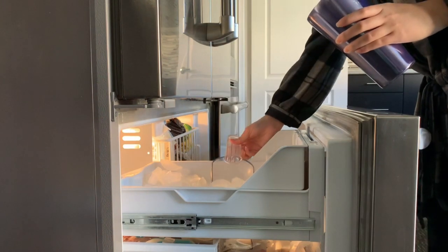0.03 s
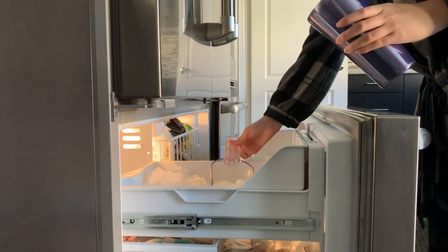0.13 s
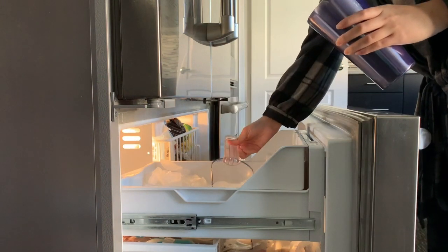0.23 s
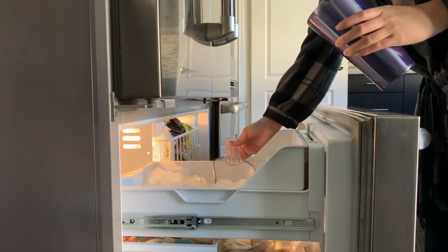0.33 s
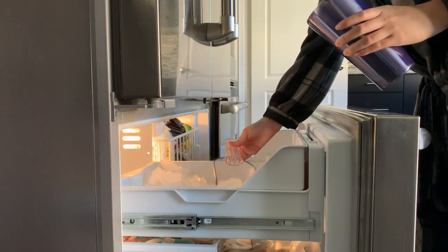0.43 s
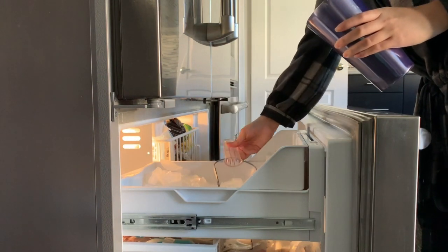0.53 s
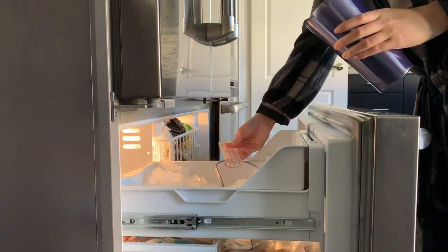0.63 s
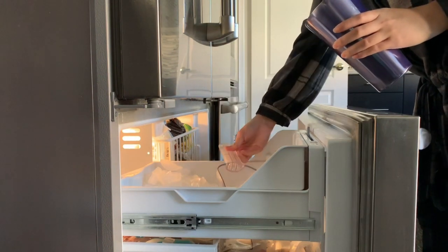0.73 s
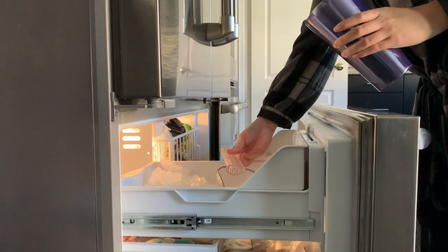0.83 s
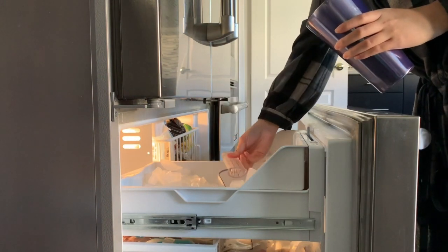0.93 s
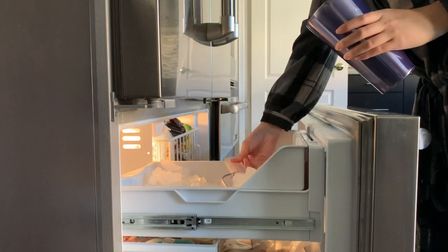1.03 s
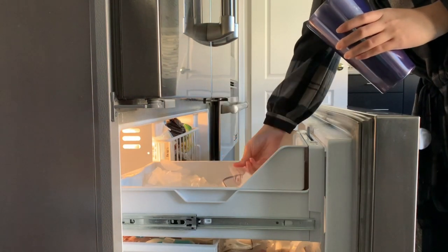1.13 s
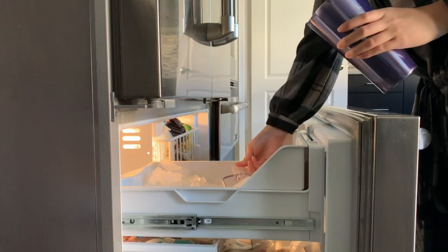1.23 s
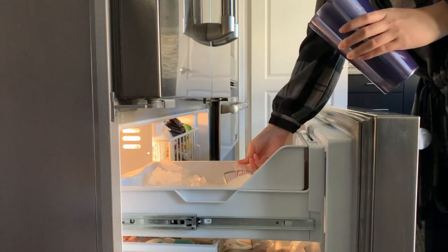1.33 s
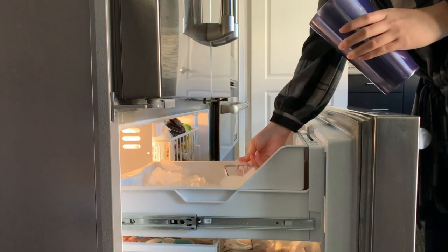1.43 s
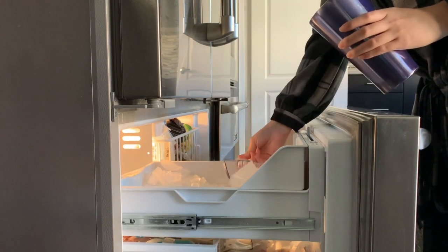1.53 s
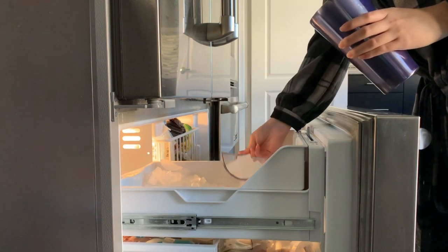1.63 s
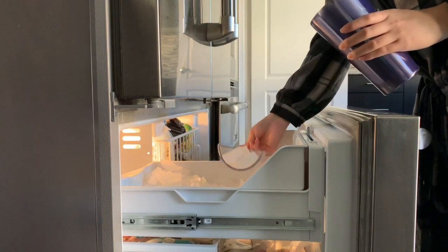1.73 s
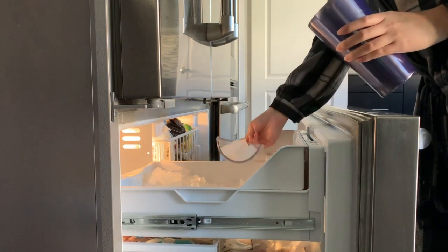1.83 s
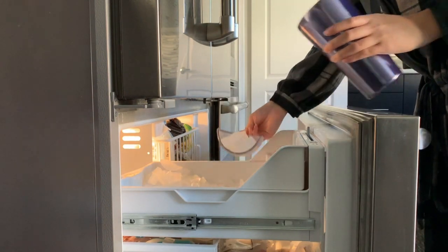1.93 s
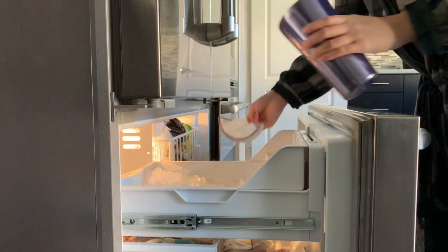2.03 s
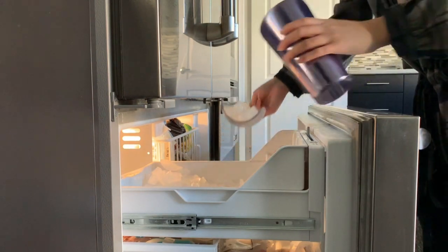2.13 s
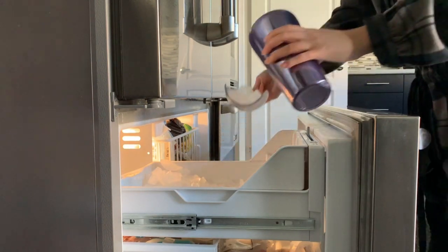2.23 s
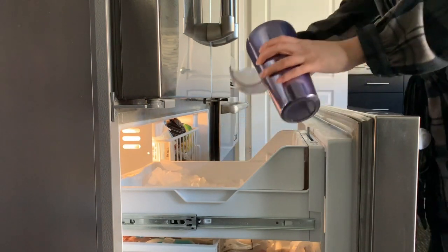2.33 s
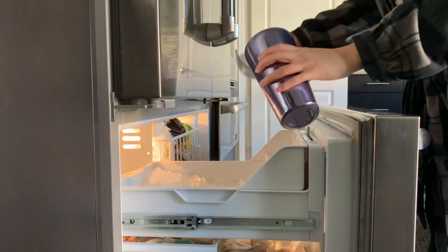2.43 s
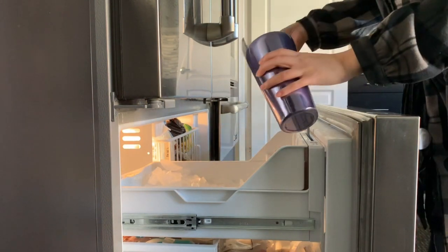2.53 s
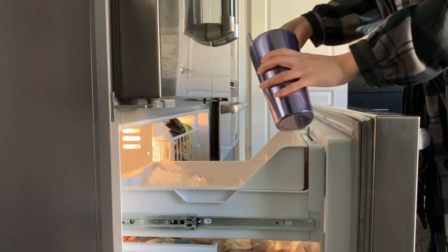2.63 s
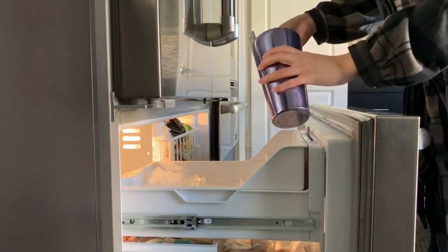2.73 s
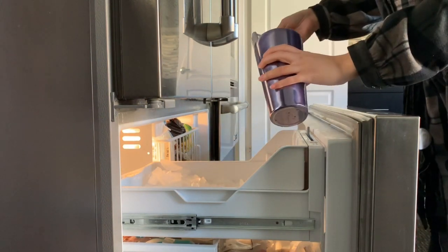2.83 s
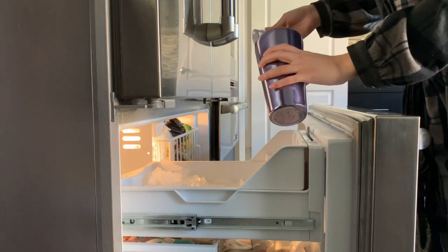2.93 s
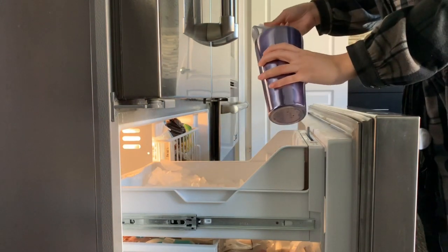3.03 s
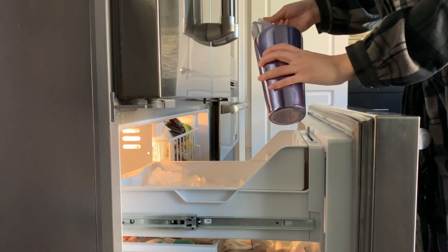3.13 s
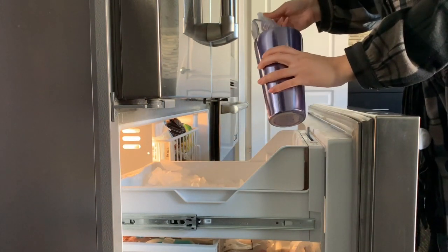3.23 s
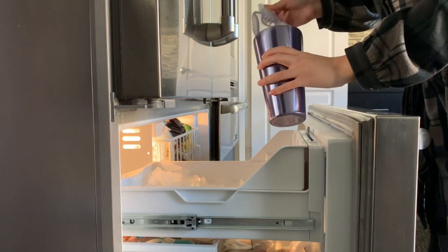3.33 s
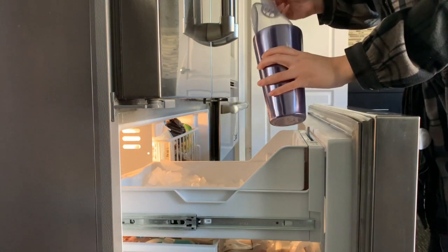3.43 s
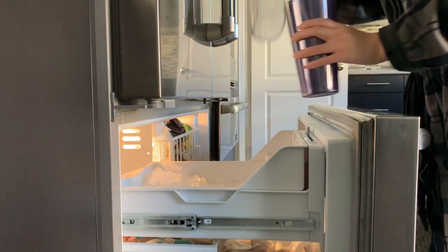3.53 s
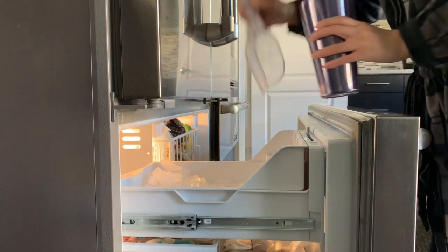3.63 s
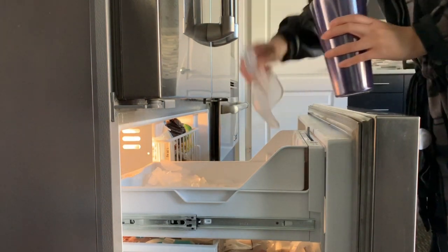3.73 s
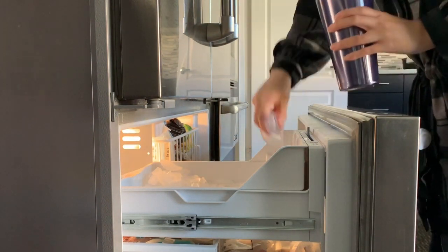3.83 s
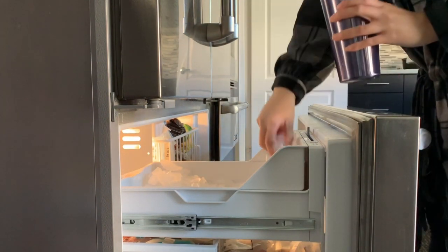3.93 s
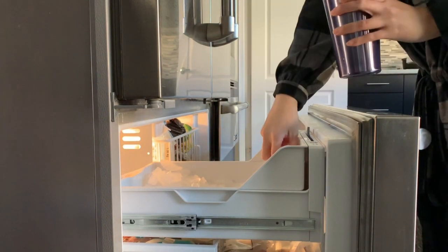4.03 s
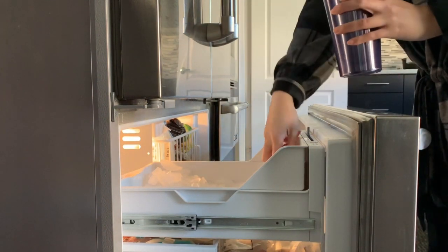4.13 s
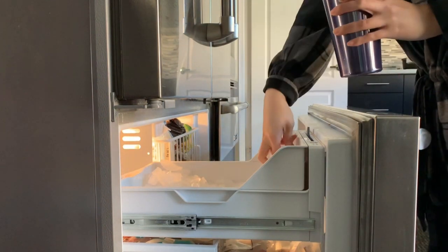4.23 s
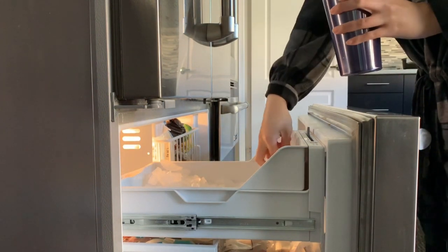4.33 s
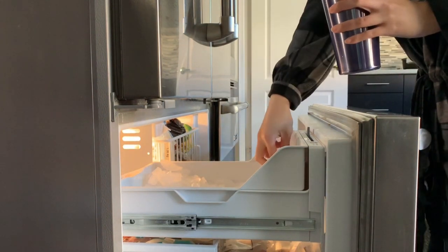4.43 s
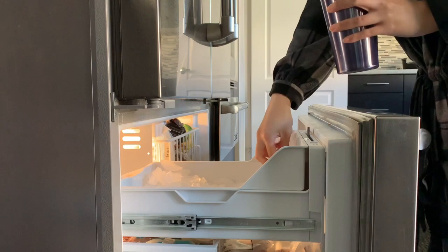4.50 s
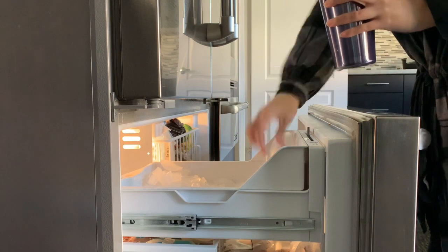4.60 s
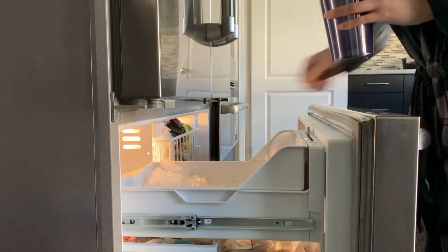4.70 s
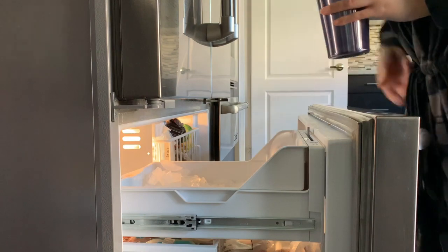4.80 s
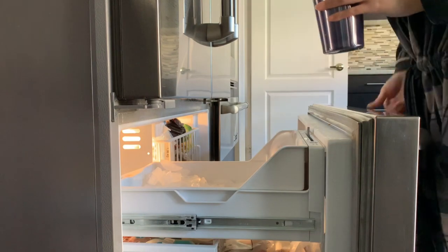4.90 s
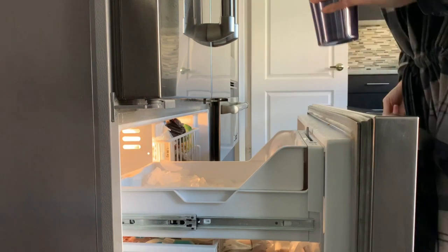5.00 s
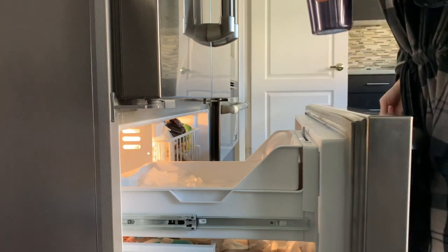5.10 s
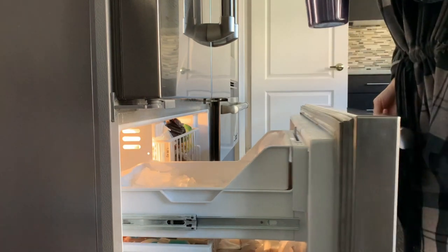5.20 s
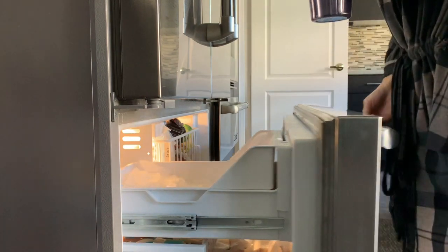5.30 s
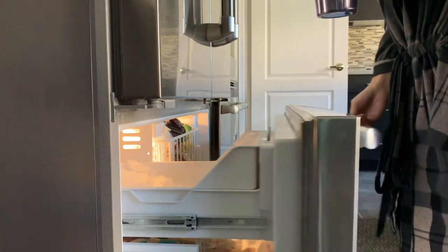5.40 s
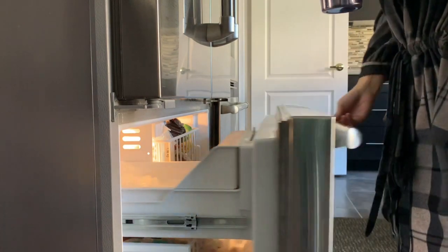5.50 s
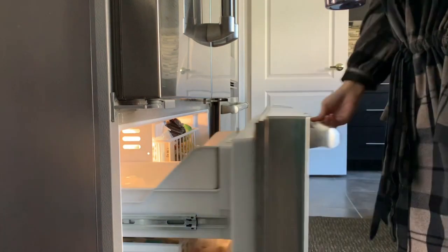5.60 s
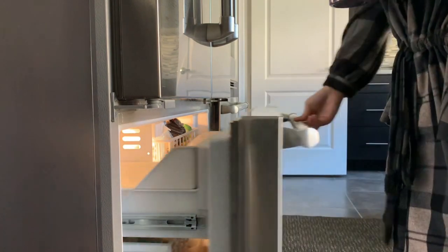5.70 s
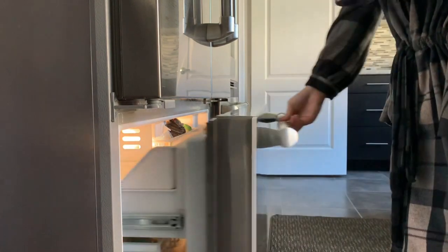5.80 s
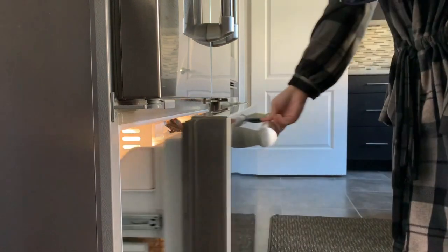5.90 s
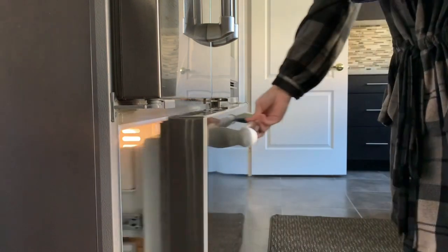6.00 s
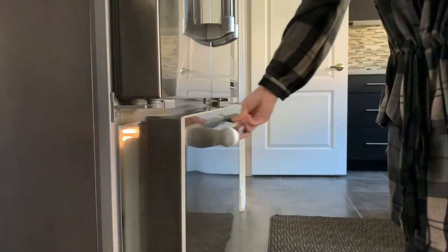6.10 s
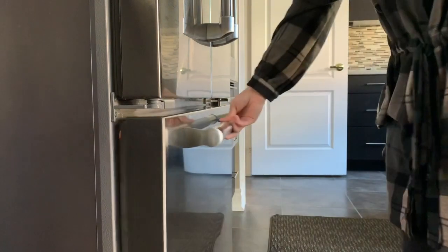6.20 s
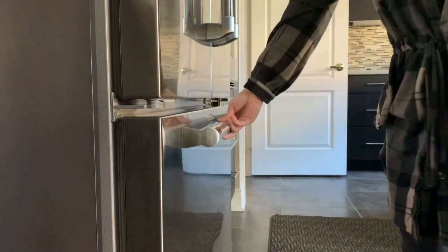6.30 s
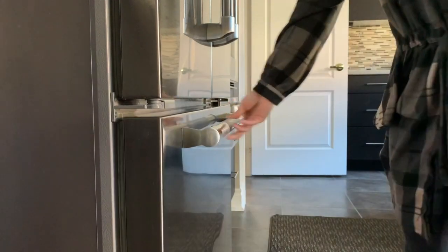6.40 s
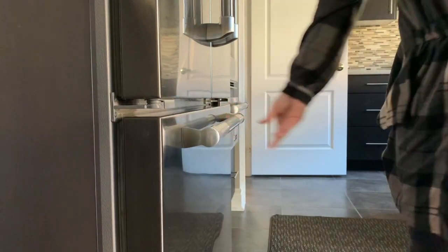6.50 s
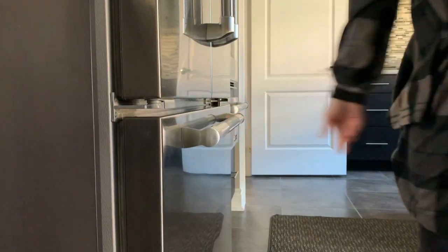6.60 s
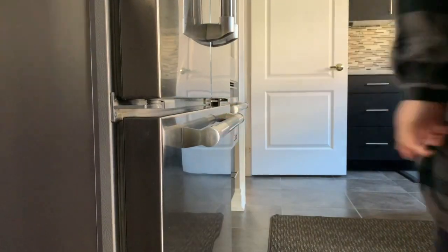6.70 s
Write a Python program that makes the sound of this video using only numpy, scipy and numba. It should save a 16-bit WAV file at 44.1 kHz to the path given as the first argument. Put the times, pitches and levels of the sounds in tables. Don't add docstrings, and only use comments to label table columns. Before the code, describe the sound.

A scoop grinds and knocks through ice cubes in a plastic bin, cubes clatter into a steel tumbler, then a freezer drawer rolls and thuds shut.

```python
import sys
import numpy as np
from scipy import signal
from scipy.fft import rfft, irfft, next_fast_len
from scipy.io import wavfile
from scipy.ndimage import uniform_filter1d
from numba import njit

SR = 44100
rng = np.random.default_rng(int(sys.argv[2]) if len(sys.argv) > 2 else 0)


def voltage_ratio(level):
    return 10 ** (np.asarray(level, float) / 20)


def dump_mix(stems):
    frames = np.atleast_2d(stems).T
    limited = np.clip(frames, -1, 1)
    pcm = np.round(limited * 32767).astype(np.int16)
    wavfile.write(sys.argv[1], SR, pcm)


N = 297675
GAP_START_S, GAP_END_S = 3.502, 3.527


def on_log(hz, table):
    table_hz, value = np.transpose(table)
    return np.interp(np.log(hz), np.log(table_hz), value)


@njit
def ring(start, hz, t60, size):
    out = np.zeros(N)
    for k in range(len(hz)):
        z = size[k] + 0j
        turn = np.exp((2j * np.pi * hz[k] - np.log(1000) / t60[k]) / SR)
        stop = start[k] + t60[k]
        if start[k] < GAP_END_S:
            stop = min(stop, GAP_END_S)
        for i in range(max(int(start[k] * SR), 0), min(int(stop * SR), N)):
            out[i] += z.imag
            z *= turn
    return out


def knocks(rows, body, count, cycles, sharp, body_db, spread_s, scatter_db, bass_db, treble_db,
           low_hz=182.0, note_db=0., wander=.08, late_s=0.):
    s, mid_db, hard_db, *note_hz = np.transpose(rows)[:, :, None]
    body_hz, width_hz, top_db = np.transpose(body)
    luck = rng.random((len(s), 5, len(body) + count))

    cube_hz = low_hz * (16400 / low_hz) ** ((np.arange(count) + luck[:, 0, :count]) / count)
    hz = np.hstack([cube_hz, body_hz * (1 + wander * (luck[:, 0, count:] - .5))])
    cube_t60 = cycles / cube_hz ** .8 / 4
    body_t60 = sharp * 2.2 / width_hz + 0 * s
    t60 = np.hstack([cube_t60, body_t60]) * (.6 + .8 * luck[:, 1])
    gain_db = -scatter_db * np.log(luck[:, 2] + .02) - 10 * np.log10(count / 3)
    gain_db[:, count:] += body_db + 0.47 * top_db
    if note_hz:
        hz[:, :1] = note_hz[0]
        t60[:, :1] = .045 * (450 / note_hz[0]) ** .5
        gain_db[:, 0] = note_db

    octave = np.log2(hz / 1900)
    bass = (bass_db - 0.51 * hard_db) * np.clip(-octave / 2.36, 0, 1)
    treble = (treble_db + hard_db) * np.clip(octave / 1.9, 0, 1)
    size = voltage_ratio(gain_db + mid_db + bass + treble) * np.sign(luck[:, 4] - .5)

    chatter = np.log(luck[:, 3] + .01) + np.log(abs(2 * luck[:, 4] - 1) + .05) + .5
    start = s - spread_s * chatter / 2 * (hz / 1900) ** -.12
    start = start + late_s * np.clip(-octave, 0, 3)
    return ring(start.ravel(), hz.ravel(), t60.ravel(), size.ravel())


def crowd(curve, rate, uneven_db, db, harder=0.):
    s, push_db = np.transpose(curve)
    length_s = s[-1] - s[0]
    luck = rng.random((int(length_s * rate), 2))
    when = s[0] + length_s * (np.arange(len(luck)) + 3 * luck[:, 0] - 2) / len(luck)
    small_db = -uneven_db * np.log(luck[:, 1] + .03)
    level_db = np.interp(when, s, push_db)
    return np.transpose([when, level_db + db + small_db, harder * (level_db + 29.5)])


# time in seconds, strength in dB.
DIG_PUSH = [
    (0.0, -17.5),
    (0.07, -24.5),
    (0.21, -33),
    (0.52, -21),
    (0.61, -40),
    (0.65, -12),
    (0.83, -15),
    (1.16, -17),
    (1.24, -33),
]
# time in seconds, strength in dB.
LIFT_PUSH = [
    (1.5, -35),
    (1.73, -39.5),
    (1.82, -55),
    (1.88, -25),
    (2.12, -80),
    (2.15, -46.5),
    (2.3, -81),
]
# start in seconds, strength in dB, hardness in dB, own pitch in Hz.
DIG_HITS = [(0.0715, -17.5, -12.5, 1716), (0.0854, -13, 2, 2430), (0.1368, -20.5, -4.5, 774),
            (0.2678, -24, 10.5, 1660), (0.28, -20.5, -8, 1634), (0.3284, -18, 6.5, 1390.0),
            (0.362, -12, 2, 686), (0.4173, -10.5, 1.5, 700), (0.4485, -18.5, -11.5, 409.0),
            (0.5136, -12.5, -1, 465), (0.5272, -9.5, -4, 687), (0.624, -25, -22, 424),
            (0.6403, -17, 7.5, 1380.0), (0.6545, -5.5, 4, 600), (0.7026, -16.5, -5, 800),
            (0.7686, -13, 2, 1600.0), (0.839, -11, -3, 950), (0.8985, -12, 6, 1390.0),
            (0.9498, -12, 4.5, 630.0), (1.0239, -11.0, -9.0, 531), (1.0537, -7.5, 0, 429),
            (1.0651, -2.5, 2.0, 671), (1.1438, -14, 6.5, 1600), (1.1837, -14, 7, 1250.0),
            (1.2182, -18, 9, 720), (1.2318, -14, 10, 2400), (0.691, -14, -3, 550), (0.7325, -14, 3, 1400),
            (0.7575, -12.5, 0, 1600), (0.787, -12, 2, 1580), (0.811, -13, -4, 500), (0.872, -16, -4, 880),
            (0.9585, -13, 0, 571), (0.978, -15.5, 2, 1500), (1.078, -9, 2, 1400), (1.105, -10.5, -4.5, 502),
            (1.159, -13.5, 2, 700), (0.9035, -10, 6, 1580), (0.669, -17, -6, 450), (0.925, -15, -3, 800),
            (1.0, -18, -5, 500), (1.12, -14, -6, 400)]
# start in seconds, strength in dB, hardness in dB, own pitch in Hz.
LIFT_HITS = [(1.274, -19, 3.5, 1330.0), (1.2919, -13, 4.5, 650), (1.3304, -18, 3.5, 1370),
             (1.3475, -9.5, 1, 350), (1.4623, -9, -2.0, 377), (1.494, -23.5, 2.5, 398),
             (1.5286, -20, -9.5, 420.0), (1.5656, -16, -1.5, 423), (1.6071, -17.5, 0.5, 415.0),
             (1.667, -25.0, 3.5, 850), (1.6834, -14, 2, 610), (1.7446, -24, 0, 409.0),
             (1.7852, -28.5, -9, 850), (1.8426, -21, -5.5, 413), (1.853, -23.5, 3.5, 1260.0),
             (1.8725, -13.5, 6, 433), (1.9081, -14, -1.5, 409.0), (1.947, -26, -10, 409.0),
             (2.022, -38, -5, 420.0), (2.142, -20, -3, 420), (2.197, -27.5, -12, 600.0),
             (1.3605, -10.5, -2.5, 520), (1.379, -18, -2.5, 850), (1.62, -21.5, 0, 1250),
             (1.585, -22, -8, 400), (1.89, -17, -6, 450), (1.93, -24, -3, 1100), (2.175, -32, -8, 600),
             (2.21, -30, -8, 500)]
# frequency in Hz, width in Hz, level in dB.
BIN = [(415, 33, 1), (1390, 32, -20), (1600, 69, -23.5), (2487, 160, 8)]


def ice_bin():
    pushed = crowd(DIG_PUSH + LIFT_PUSH, rate=200, uneven_db=5, db=-13, harder=0.058)
    grind = knocks(pushed, BIN, count=14, cycles=44, sharp=0.44, body_db=3, spread_s=0.0022,
                   scatter_db=2.5, bass_db=-7.5, treble_db=-7)
    knock = knocks(DIG_HITS + LIFT_HITS, BIN, count=100, cycles=21.5, sharp=1.0, body_db=3.5, spread_s=.005,
                   scatter_db=2.5, bass_db=-7.5, treble_db=-9.5, note_db=-1.0)
    return grind + knock


# time in seconds, strength in dB.
POUR_PUSH = [
    [(2.72, -45), (2.728, -12.5), (2.744, -43), (2.95, -46)],
    [(2.99, -43.5), (3.118, -23), (3.126, -10.5), (3.172, -12), (3.264, -14), (3.5, -30.5)],
    [(3.527, -46), (3.567, -39.5), (3.597, -55), (3.8, -75.5)],
]
# start in seconds, strength in dB, hardness in dB.
POUR_HITS = [(2.7268, -23, 6.5), (2.7906, -24.5, -4), (2.9847, -38.5, 1), (3.0036, -32, -2),
             (3.0166, -30, 6), (3.0391, -27.5, -4), (3.0939, -30.5, 5), (3.1243, -6.5, 2.5),
             (3.1987, -12, 12), (3.2211, -7, 8.5), (3.2551, -8, 4.5), (3.284, -15.5, -5), (3.3808, -15, 6),
             (3.397, -15, 9.5), (3.4591, -20.5, -4.5), (3.5364, -25.5, -7.5), (3.5609, -29, 7.5),
             (3.6527, -35, -13.5), (3.7471, -49, -9)]
# frequency in Hz, width in Hz, level in dB.
TUMBLER = [(1380, 44, -11), (2050, 180, 0.5), (2570, 21, -13.5), (2800, 60, -5), (3224, 40, -15),
           (3600, 86, -0.5)]


def tumbler():
    pile = [crowd(part, rate=300, uneven_db=2.5, db=-14, harder=.1) for part in POUR_PUSH]
    slide = knocks(np.vstack(pile), TUMBLER, count=14, cycles=17, sharp=0.81, body_db=3.5, spread_s=.002,
                   scatter_db=-0.5, bass_db=-8.5, treble_db=0.5, low_hz=1450, wander=.015)
    clack = knocks(POUR_HITS, TUMBLER, count=100, cycles=13, sharp=0.48, body_db=-3.5, spread_s=.003,
                   scatter_db=3.5, bass_db=-19.5, treble_db=-8, low_hz=1100, wander=.015)
    return slide + clack


# start in seconds, peak in dB, frequency in Hz.
COLUMN = [(2.727, -14.5, 530), (2.764, -20, 521), (2.789, -19.5, 539), (2.807, -22.5, 530),
          (2.825, -24, 540), (2.845, -26, 560), (2.745, -17, 545), (2.97, -36, 540), (3.017, -30, 622),
          (3.04, -31, 520), (3.065, -30, 499.5), (3.099, -28, 622), (3.146, -12, 635), (3.166, -13, 640),
          (3.186, -13, 620.5), (3.205, -11, 640), (3.22, -10, 615), (3.24, -11, 636), (3.262, -14.5, 640),
          (3.305, -24, 600), (3.343, -18, 620), (3.385, -22, 660), (3.22, -20, 480), (3.34, -24, 490),
          (3.452, -27, 480), (3.65, -44, 680), (3.42, -28, 600), (3.455, -29, 580), (3.468, -30.5, 641),
          (3.57, -41.5, 700)]
# start in seconds, peak in dB, frequency in Hz.
WALL = [(2.9402, -45, 2060), (3.1282, -6, 2096), (3.1394, -18, 2050), (3.2016, -13.5, 2013),
        (3.259, -11, 2018), (3.2875, -13, 2120), (3.4056, -23.5, 1834), (3.4508, -28, 1800),
        (3.5602, -27, 1860), (3.0145, -34.5, 2840), (3.038, -34, 2800), (3.0964, -23, 2800),
        (3.1223, -11, 2600), (3.2004, -10.5, 2730), (3.2205, -6, 2580), (3.2481, -23, 2480),
        (3.2978, -20, 2570), (3.3469, -20, 2536), (3.528, -30, 2890), (3.5603, -20, 2870),
        (3.1438, -11.5, 3570), (3.1537, -13.5, 3605), (3.2201, -26, 3670), (3.26, -12.5, 3240),
        (3.3787, -19, 3260), (3.575, -33.5, 3770), (3.143, -20, 4650), (3.392, -23, 5070),
        (3.575, -31, 1840), (3.578, -28, 2870), (3.652, -37, 1850), (3.697, -42.5, 1850),
        (3.747, -45, 1830), (3.561, -34, 1274), (3.66, -40, 1270), (3.645, -43.5, 3770), (3.62, -38, 2870),
        (3.66, -41, 2780), (3.2, -23, 1350), (3.22, -22, 1300), (3.256, -23, 1250), (3.124, -22, 1555),
        (2.728, -30, 2080), (2.75, -33, 1760), (2.792, -31, 2080), (3.02, -36, 1800), (3.222, -14, 2700),
        (3.33, -22, 3300), (3.345, -21, 2080), (3.2, -20, 6300), (3.222, -18, 6700), (3.125, -19, 6100),
        (3.3, -24, 5400)]


def tumbler_ring():
    s, db, hz = np.transpose(COLUMN)
    air = ring(s, hz, .11 + 0 * s, voltage_ratio(db)) - ring(s, hz, 0.022 + 0 * s, voltage_ratio(db))
    s, db, hz = np.transpose(WALL)
    t60 = np.where(s < GAP_START_S, .14, .065)
    return air + ring(s, hz, t60, voltage_ratio(db - 3.0)) + ring(s, .98 * hz, t60, voltage_ratio(db - 11.5))


# time in seconds, strength in dB.
SETTLE_PUSH = [
    (3.995, -32.5),
    (4.072, -41),
    (4.306, -26),
    (4.558, -53),
]
# start in seconds, strength in dB, hardness in dB, own pitch in Hz.
SCOOP_HITS = [(3.9862, -20, -2, 705), (3.9875, -16, -3, 1600), (4.1322, -25, 6.5, 408),
              (4.1554, -21.5, -10, 586), (4.176, -12.5, 2.5, 700), (4.2033, -17.5, -6.5, 770),
              (4.2373, -32, -5.5, 856), (4.2793, -9.5, 4.5, 608), (4.2974, -11.5, 4.5, 421.4),
              (4.3247, -10.5, 4.5, 860), (4.4094, -33, -5, 690), (4.502, -31, 9, 1470),
              (4.039, -33, -5, 802), (4.104, -36, -8, 450), (4.14, -28.5, 0.5, 880), (4.241, -30, -5, 1450),
              (4.283, -22, -3, 1620), (4.327, -20.5, -3, 2520), (4.206, -25, -3, 2300),
              (4.312, -20, -6, 420), (3.9875, -22, 0, 2500), (3.972, -56, -3, 1950), (4.012, -35, -3, 850),
              (4.335, -19, -6, 400), (4.152, -30, 0, 1600)]
# frequency in Hz, width in Hz, level in dB.
SCOOP = [(409, 50, -9), (608, 55, 22.5), (800, 80, 25), (1380, 45, -10)]


def scoop():
    pushed = crowd(SETTLE_PUSH, rate=380, uneven_db=1.7, db=-25.5, harder=.05)
    shift = knocks(pushed, SCOOP, count=14, cycles=38, sharp=0.39, body_db=-5.5, spread_s=0.0034,
                   scatter_db=8.0, bass_db=6.5, treble_db=-28)
    knock = knocks(SCOOP_HITS, SCOOP, count=110, cycles=30, sharp=1.0, body_db=2.0, spread_s=0.0019,
                   scatter_db=1.0, bass_db=-3.9, treble_db=-16, note_db=3.5)
    return shift + knock


# time in seconds, strength in dB.
ROLL_PUSH = [
    (4.95, -66.5),
    (5.2, -64),
    (5.26, -45),
    (5.812, -36),
    (5.832, -23.5),
    (5.932, -39.5),
    (6.088, -36.5),
]
# time in seconds, strength in dB.
SEAL_PUSH = [
    (6.118, -28),
    (6.212, -63.5),
    (6.238, -25),
    (6.322, -33),
    (6.558, -56),
    (6.75, -71),
]
# start in seconds, strength in dB, hardness in dB, own pitch in Hz.
DRAWER_HITS = [(5.1894, -55, 10, 221.0), (5.2227, -45, -6.5, 425.6), (5.3578, -50, -13.5, 434),
               (5.6219, -28, 5.5, 249), (5.7047, -32.5, 7.5, 362), (5.7574, -43, 27.5, 243.0),
               (5.8212, -19, 20, 333.4), (5.8392, -27, 3.5, 478.6), (5.8892, -34, -20, 358),
               (5.9754, -39, -15.5, 435), (6.1066, -10, 12, 301.3), (6.1314, -36.5, 10, 279),
               (6.1714, -36, 2.5, 381), (6.2448, -22, -9, 305), (6.2691, -29, -6.5, 350.5),
               (6.3101, -14, 4.5, 395), (6.3297, -31, -8, 700), (6.3911, -27, -5, 419.4),
               (6.4797, -40, -11, 601), (6.7014, -51.5, -12, 457), (5.24, -36, 6, 1500),
               (5.63, -36, 6, 1520), (5.535, -40.5, -11, 495), (5.579, -37.5, -12, 436),
               (5.999, -36.5, -14.5, 400), (6.026, -36, -15.5, 370), (6.058, -37.5, -15, 330),
               (6.228, -34, -12, 350), (6.258, -27, -8, 300), (6.15, -30, -12.5, 260),
               (6.36, -27.5, -11.5, 300), (6.452, -36, -12, 323.6), (6.31, -22, 0, 1424)]
# frequency in Hz, width in Hz, level in dB.
DRAWER = [(283, 50, 8.5), (343, 70, 5), (420, 97, -10), (600, 300, -3), (1121, 160, -5), (1400, 170, -4.5)]


def drawer():
    ticks = crowd(ROLL_PUSH + SEAL_PUSH, rate=600, uneven_db=0.42, db=-13, harder=0.17)
    roll = knocks(ticks, DRAWER, count=14, cycles=22, sharp=0.19, body_db=0.0, spread_s=.002,
                  scatter_db=3.5, bass_db=14, treble_db=-2.5, low_hz=130)
    catch = knocks(DRAWER_HITS, DRAWER, count=120, cycles=24.4, sharp=0.58, body_db=6.5, spread_s=.0035,
                   scatter_db=2.5, bass_db=14.0, treble_db=-4, low_hz=208.8, note_db=1.5, late_s=.0015)
    return roll + voltage_ratio(-4.5) * catch


# start in seconds, peak in dB,
# frequency in Hz, t60 in seconds.
THUDS = [(0.529, -23.5, 99.4, 0.25), (1.059, -19.5, 98.4, 0.23), (3.553, -28.5, 56.5, 0.25),
         (5.009, -20.5, 152.7, 0.12), (5.369, -23.5, 96, 0.25), (5.83, -11, 72, 0.23),
         (6.255, -9.5, 66, 0.3), (6.308, 0.5, 151.8, 0.14), (6.329, -14.5, 140, 0.28),
         (6.478, -26, 79.1, 0.39), (6.108, -17, 75, .2), (6.109, -7, 301, .08), (5.835, -15, 480, .05),
         (5.93, -20, 160, .12), (6.15, -18, 220, .1), (1.348, -24, 135, .15), (1.463, -24, 125, .15),
         (1.57, -28, 110, .15), (4.178, -26, 200, .1), (4.295, -20, 175, .15), (6.4, -18, 95, .2),
         (6.311, -6, 33.7, .45),
    (6.319, -7.5, 48.7, 0.4),
]


def low_thuds():
    s, db, hz, t60 = np.transpose(THUDS)
    return ring(s, hz, t60, voltage_ratio(db)) - ring(s, hz, 0.075 * t60, voltage_ratio(db))


# start in seconds, peak in dB, frequency in Hz.
SNAPS = [
    (6.1035, -22, 4400),
    (6.108, -20, 4300),
    (6.108, -18.5, 4780),
    (6.3078, -22.5, 3490),
    (6.3095, -19.5, 4300),
]


def snaps():
    s, db, hz = np.transpose(SNAPS)
    return ring(s, hz, 0.015 + 0 * s, voltage_ratio(db + 4))


# frequency in Hz, density in dB per Hz.
AIR = [(12, -58.5), (20, -35), (48, -8), (127, -5), (145, -15.5), (200, -3.5), (241, -13), (380, -19.5),
       (583, -31.5), (1170, -40), (1290, -39), (1530, -57), (4200, -66.5), (12000, -82), (22000, -120)]
# frequency in Hz, level in dB.
HUM = [(59.2, -46.5), (96.9, -52.5), (118.4, -56.5), (172.3, -54), (387.6, -66.5), (414.5, -68),
       (791.3, -78.5), (1244, -76.5), (3612, -94.5)]


def freezer():
    hz = np.fft.rfftfreq(N, 1 / SR) + 1
    air = irfft(rfft(rng.standard_normal((2, N))) * voltage_ratio(on_log(hz, AIR)), N)
    out = air * voltage_ratio(-36) / air.std()
    for line_hz, db in HUM:
        held = np.repeat(rng.standard_normal(N // 2000 + 1), 2000)
        waver = uniform_filter1d(held, size=3000)[:N]
        phase = 2 * np.pi * np.cumsum(line_hz + 1.5 * waver) / SR
        out += voltage_ratio(db + 9 + 2.5 * waver) * np.sin(phase)
    return out


# frequency in Hz, t60 in seconds.
KITCHEN = [(125, 0.35), (500, 0.53), (2000, 0.58), (6000, 0.41), (16000, 0.17)]


def kitchen(x):
    delay_s, move_s = 0.0014, .3
    t = np.arange(SR // 4 * 3) / SR
    hz = np.fft.rfftfreq(len(t), 1 / SR) + 1
    bands = 30 * 2. ** np.arange(10)
    share = np.array([np.clip(1 - np.abs(np.log2(hz / band)), 0, 1) for band in bands])[:, None]
    swell = 1 - np.exp(-(t / delay_s) ** 2)
    fade = voltage_ratio(-60 * t / on_log(bands, KITCHEN)[:, None, None]) * swell
    step = int(move_s * SR)
    x = np.pad(x, (step, 2 * step))
    out = np.zeros((2, N + 3 * step + len(t)))
    for i in range(0, N + step, step):
        if not x[i:i + 2 * step].any():
            continue
        noise = rfft(rng.standard_normal((2, len(t))))
        tail = (irfft(noise * share, len(t)) * fade).sum(axis=0)
        tail = tail / np.sqrt((tail ** 2).sum() / 2)
        piece = x[None, i:i + 2 * step] * np.hanning(2 * step)
        out[:, i:i + 2 * step + len(t) - 1] += signal.fftconvolve(piece, tail)
    return out[:, step:step + N]


def scene():
    # sound, left over right in dB, level sent to the walls in dB
    sources = [(ice_bin(), 5.0, -0.5), (tumbler(), 7.6, 2.0), (scoop(), 8.7, -3.0),
               (drawer() + low_thuds(), 4.7, -1.5), (tumbler_ring(), 2.5, -10), (snaps(), 3, -16)]
    parts, left_db, sent_db = [np.array(column) for column in zip(*sources)]
    direct = voltage_ratio([left_db / 2, -left_db / 2]) @ parts
    sent = voltage_ratio(sent_db) @ parts
    before = np.arange(N) / SR < GAP_END_S
    wet = np.where(before, kitchen(sent * before), kitchen(sent * ~before))
    return direct + voltage_ratio(-1) * wet + freezer()


# frequency in Hz, gain in dB.
MIC = [(25, -12.5), (230, -9.5), (340, -5.5), (430, 0), (1000, -1), (2500, -1), (4200, 2.5), (5800, 2.5),
       (8000, 8), (12000, 10.5), (16000, 6), (16400, 3), (17000, -30)]
# frequency in Hz, share of the left-right difference kept.
WIDTH = [(30, .05), (125, .2), (300, 0.25), (700, 0.85), (2000, 1), (5000, 1.16), (7500, 0.53), (9000, 0.3),
         (16000, 0.2)]
# frequency in Hz, lead of the left port in radians.
PORTS = [(0, 0), (950, -.9), (2580, 1.4), (3620, .5), (5700, 2.8), (7900, 0), (9350, -2.8), (10200, -3.5),
         (17000, -15.25)]


def phone_ports(dry):
    size = next_fast_len(N + SR // 10)
    hz = np.fft.rfftfreq(size, 1 / SR)
    padded = np.pad(dry, ((0, 0), (0, size - N)), "linear_ramp")
    left, right = rfft(padded) * voltage_ratio(on_log(hz + 1, MIC))
    both = (left + right) / 2
    apart = (left - right) / 2 * on_log(hz + 1, WIDTH)
    turn = np.exp(.5j * np.interp(hz, *np.transpose(PORTS)))
    return irfft([(both + apart) * turn, (both - apart) / turn], size)[:, :N]


def top_cut(x):
    return signal.sosfilt(signal.butter(12, 16640, fs=SR, output="sos"), x)


def record(dry):
    t = np.arange(N) / SR
    in_gap = (t > GAP_START_S) & (t < GAP_END_S)
    gap = np.where(in_gap, voltage_ratio(-20 - 3500 * (t - GAP_START_S)), 1)
    mix = np.tanh(0.81 * phone_ports(dry) * gap) / 0.85
    return top_cut(mix)


dry = scene()
out = record(dry)
dump_mix(out)
```